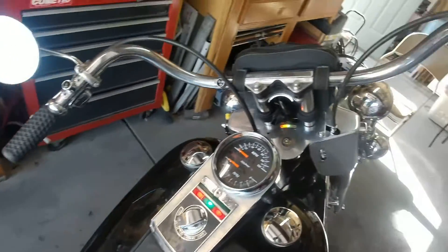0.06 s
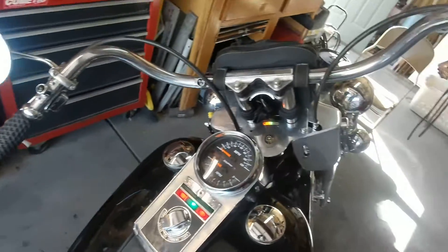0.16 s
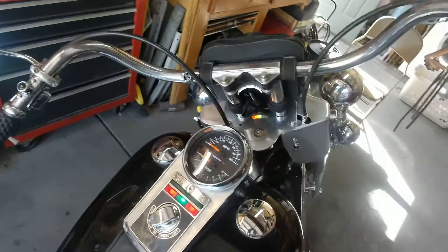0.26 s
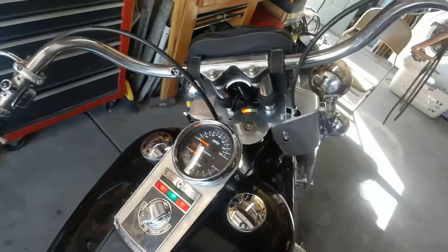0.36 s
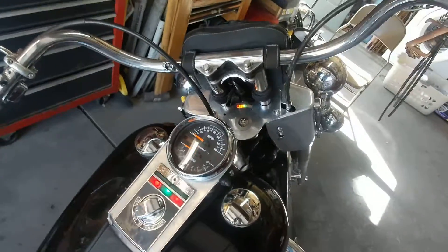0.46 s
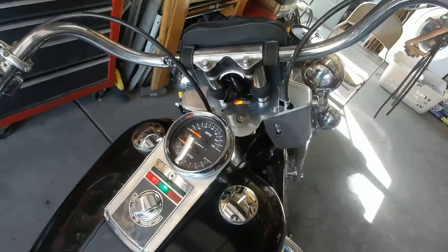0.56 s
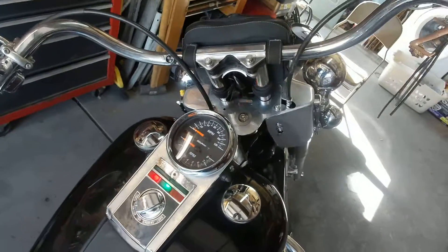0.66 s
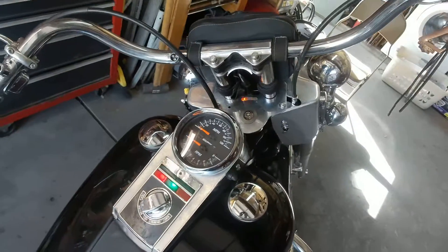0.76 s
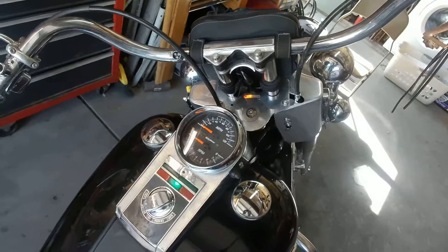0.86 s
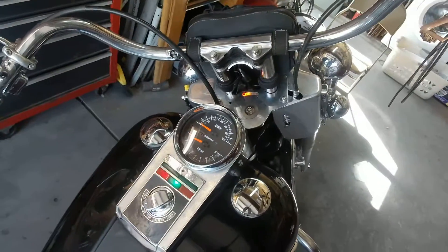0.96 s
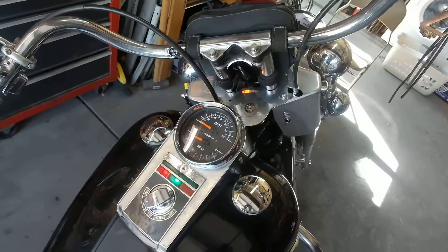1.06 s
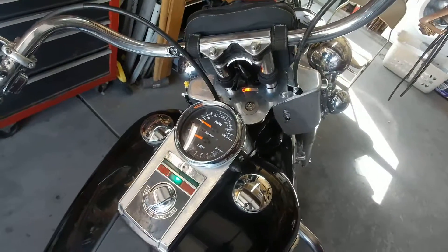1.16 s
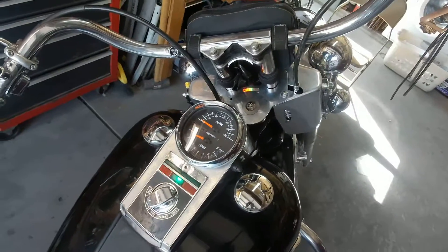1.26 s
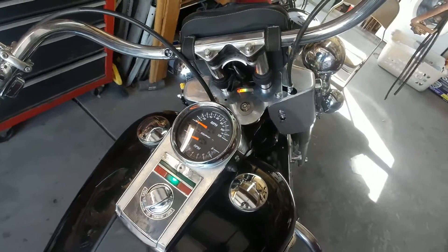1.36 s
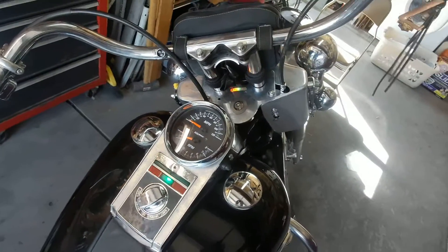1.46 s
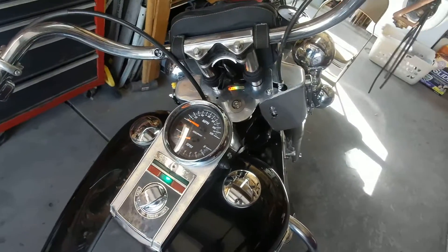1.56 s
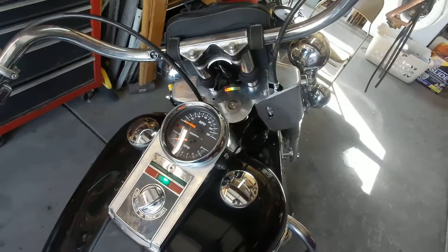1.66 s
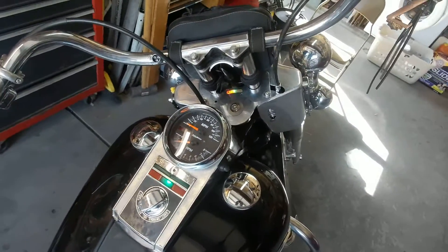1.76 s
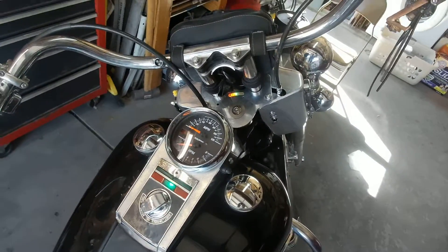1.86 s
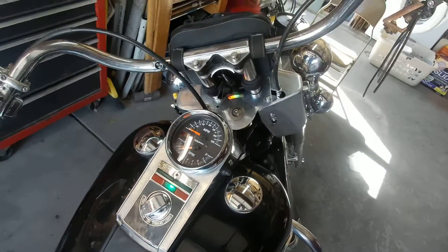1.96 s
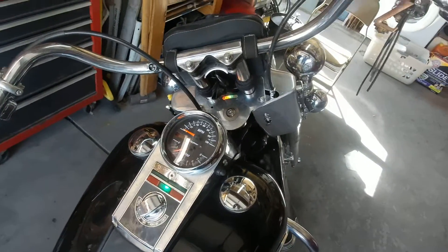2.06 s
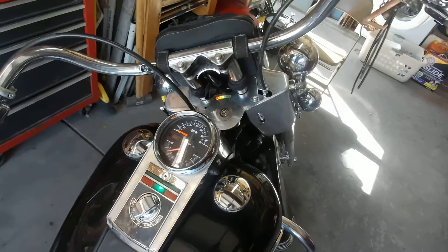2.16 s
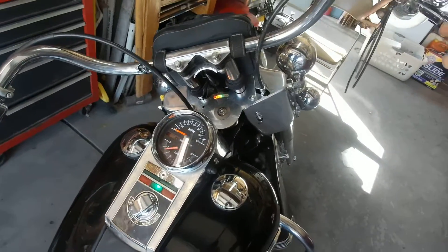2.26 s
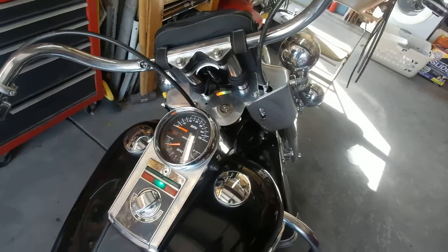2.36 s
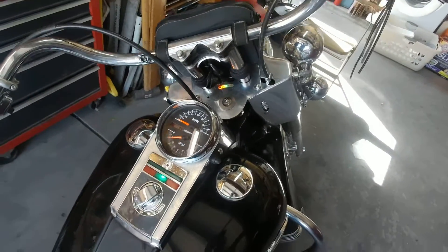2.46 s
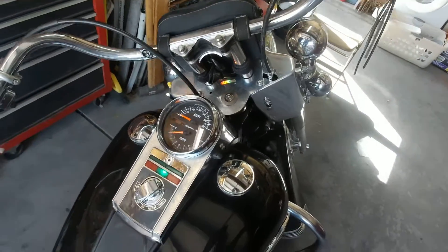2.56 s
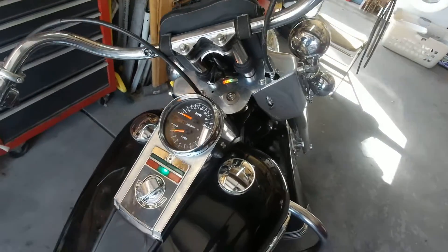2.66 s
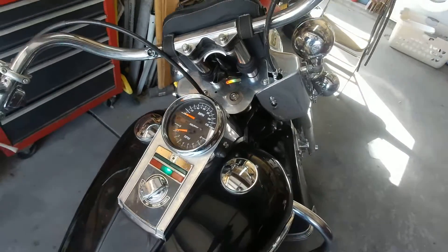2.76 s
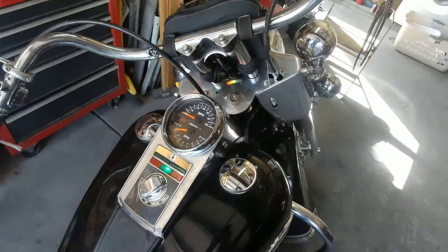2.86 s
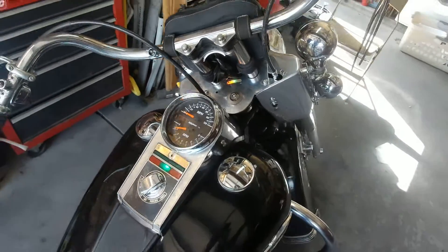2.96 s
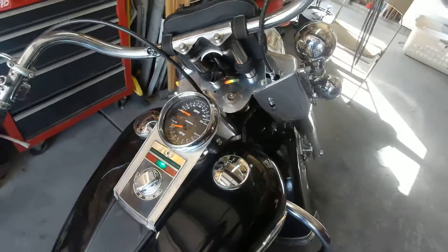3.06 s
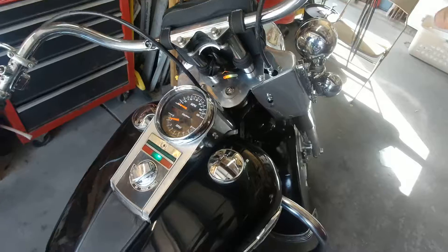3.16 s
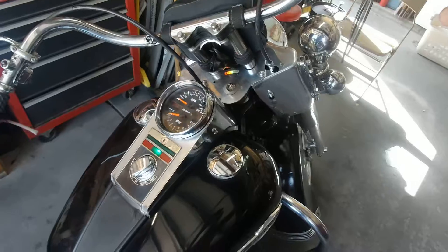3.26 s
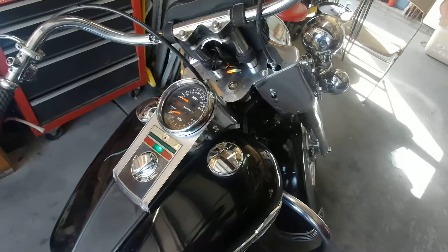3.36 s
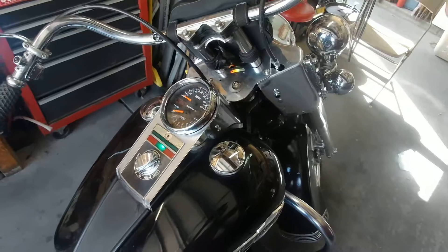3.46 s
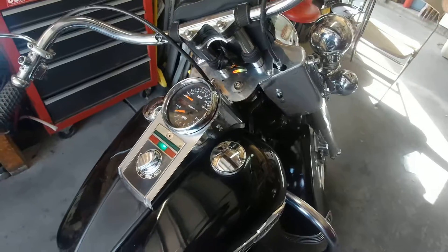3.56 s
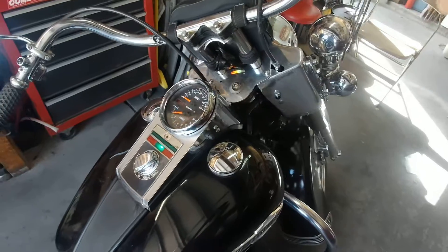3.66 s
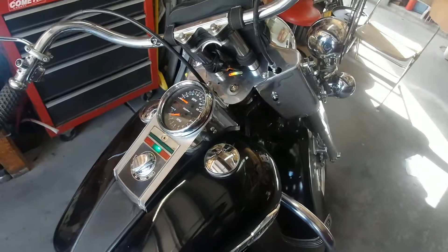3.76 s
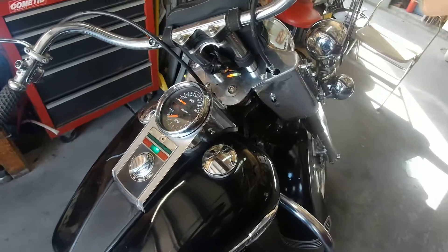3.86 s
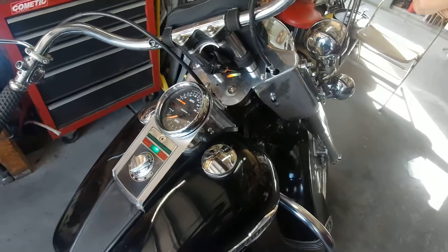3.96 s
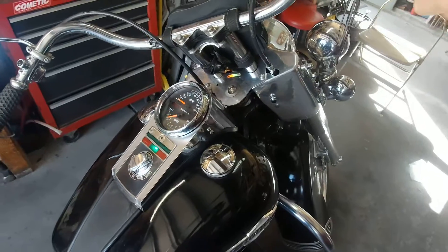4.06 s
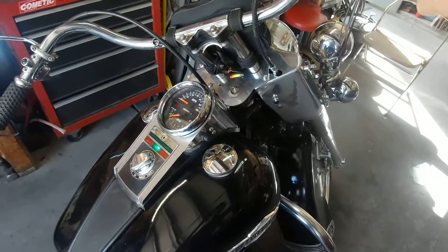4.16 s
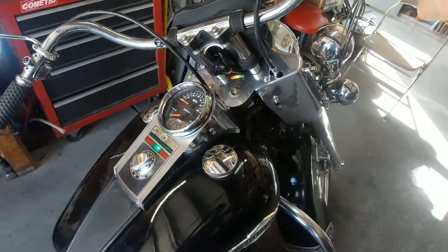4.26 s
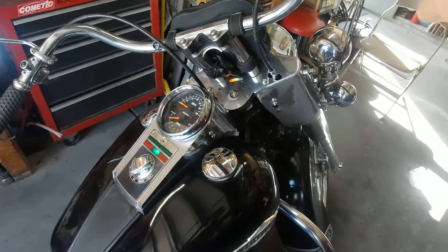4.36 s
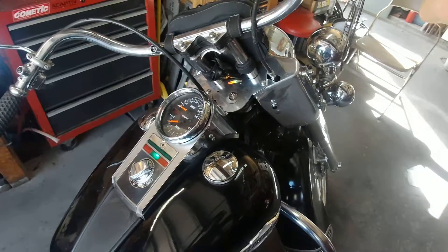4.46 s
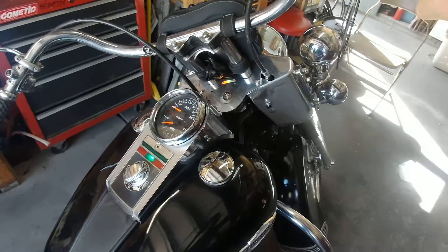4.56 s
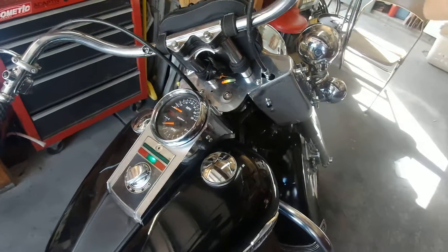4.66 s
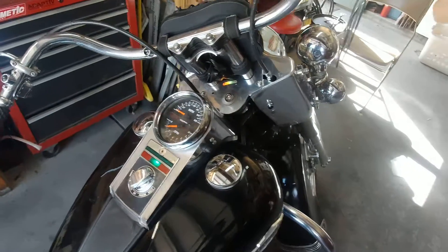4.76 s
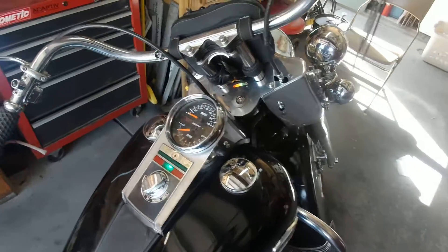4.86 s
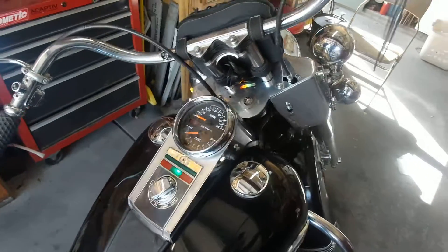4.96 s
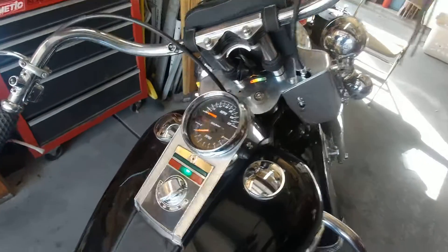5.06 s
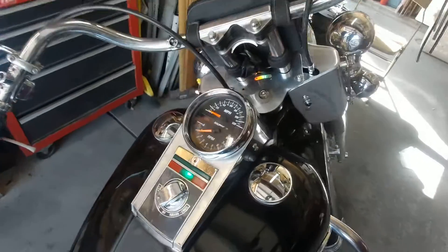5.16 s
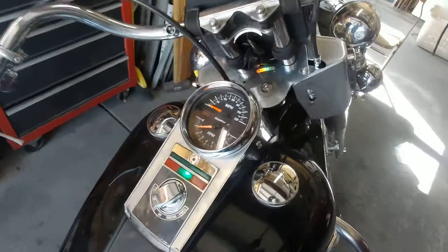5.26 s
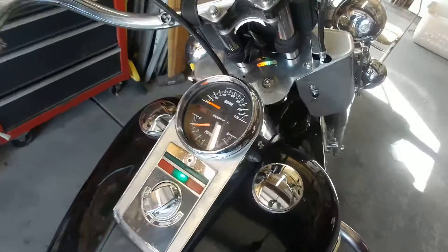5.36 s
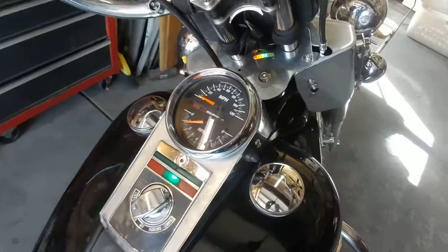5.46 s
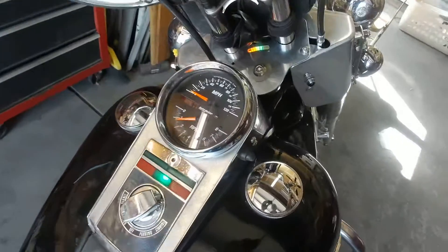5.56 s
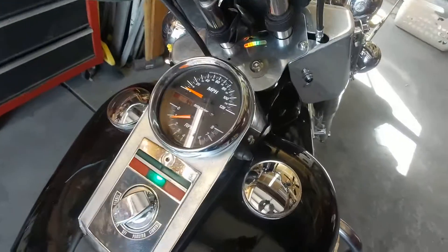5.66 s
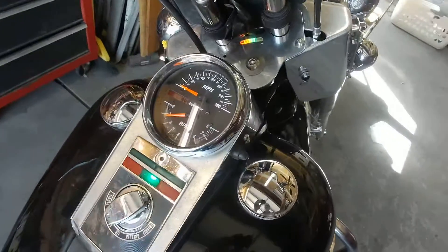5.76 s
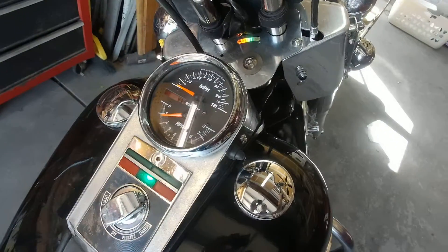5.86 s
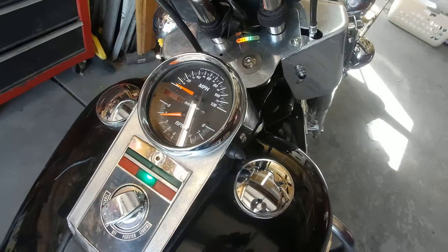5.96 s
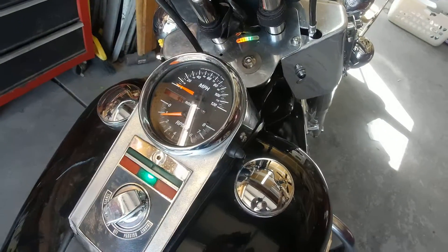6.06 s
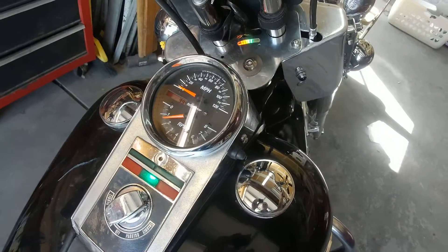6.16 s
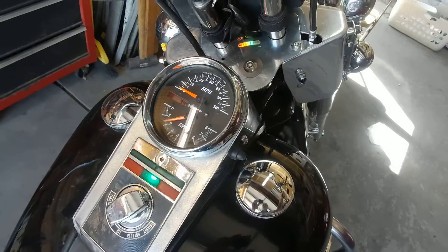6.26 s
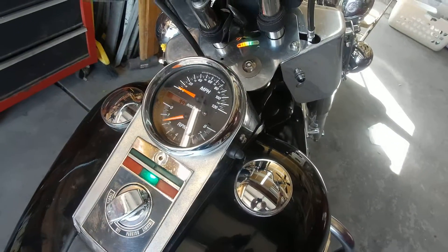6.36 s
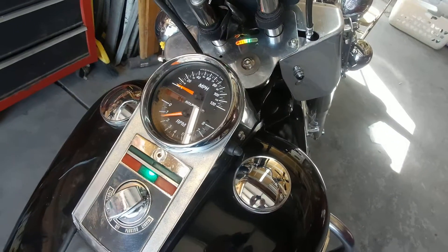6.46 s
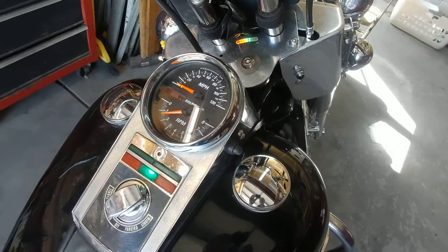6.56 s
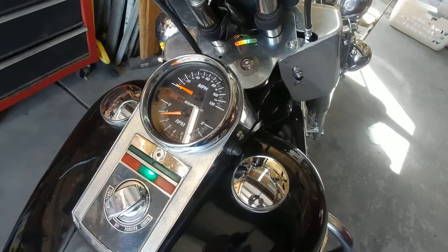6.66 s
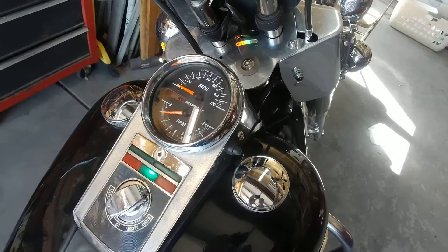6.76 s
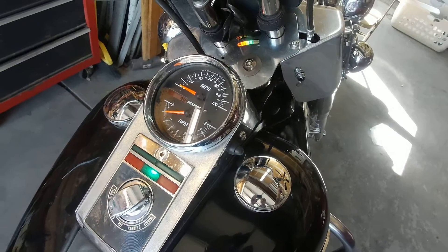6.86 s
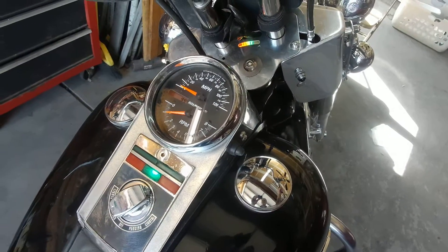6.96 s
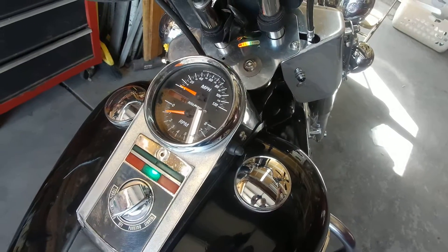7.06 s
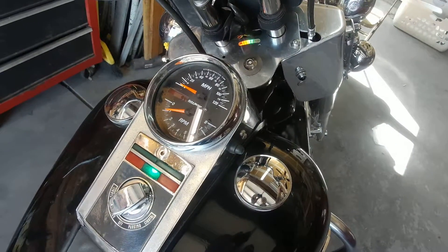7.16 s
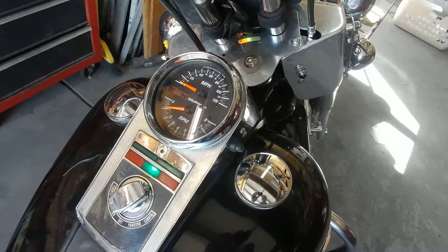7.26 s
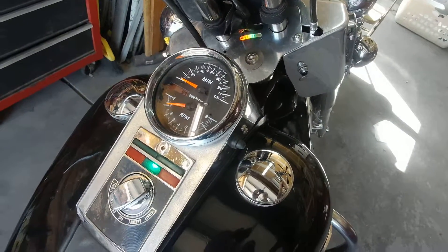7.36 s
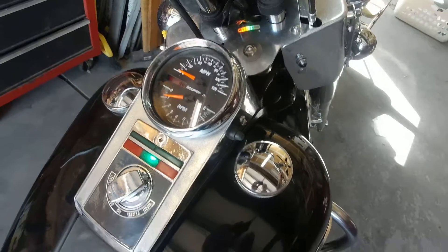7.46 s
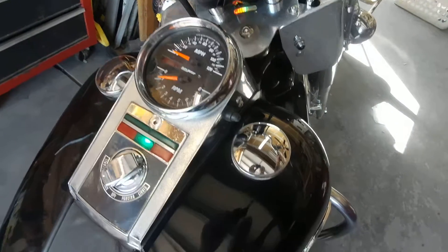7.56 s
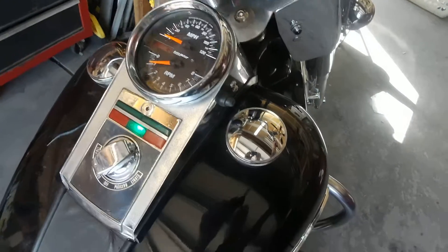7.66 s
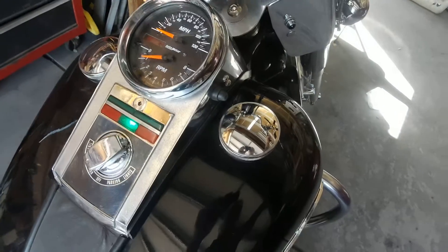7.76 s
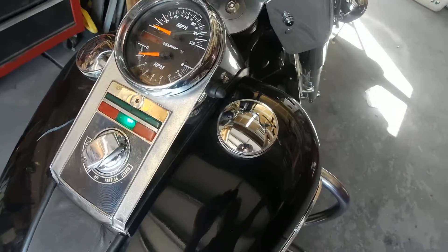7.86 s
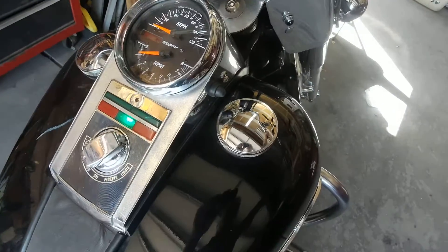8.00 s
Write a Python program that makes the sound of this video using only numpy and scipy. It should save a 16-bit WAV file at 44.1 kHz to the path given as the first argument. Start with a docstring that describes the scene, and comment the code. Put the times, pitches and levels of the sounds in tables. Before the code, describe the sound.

Heard from the saddle indoors, a large motorcycle cranks, fires up with booming cracks, revs in three short bursts and lopes unevenly.

```python
"""A big V-twin motorcycle in a garage, heard from the saddle: first the starter's pinion clacks in over faint room
tone, whines and grinds, its pitch sagging at each compression. The engine catches: gas slugs ring damped low
resonances under noise bursts of crack and blat, while meshing teeth whine, valve gear clatters and the intake barks.
Three blips of the throttle follow, with coasting between; the loping idle leaves about one stroke in four weak.
The walls answer with a diffuse tail throughout; the microphone rounds off tall peaks and adds bright overload ticks."""
import sys
import numpy as np
from scipy import signal
from scipy.fft import rfft, irfft, next_fast_len
from scipy.io import wavfile
from scipy.ndimage import uniform_filter1d, map_coordinates

SR = 44100
rng = np.random.default_rng(int(sys.argv[2]) if len(sys.argv) > 2 else 0)


def output_pcm(signal):
    """Save a mono or channel-first signal as 16-bit PCM at the path in sys.argv[1].

    Samples are clipped to [-1, 1] before scaling.
    """
    pcm = np.clip(np.atleast_2d(signal).T, -1, 1) * 32767
    wavfile.write(sys.argv[1], SR, np.round(pcm).astype(np.int16))


N = 354123

# All table levels are relative: they are set before the mix.
# faint low room tone: (frequency [Hz], level per Hz [dB])
ROOM_TONE = [(20, 2.5), (60, -9), (150, -11.5), (220, -23.5), (400, -26), (1000, -29), (3000, -43.5),
             (12000, -74.5)]
# decay of the walls' diffuse answer: (frequency [Hz], t60 [s])
GARAGE_DECAY = [(150, 0.94), (1000, 0.25), (4000, 0.32), (12000, 0.29)]

# solenoid and pinion striking home: (time [s], level [dB])
PINION_CLACKS = [(0.559, -18.5), (0.587, -9), (0.725, -11.5), (0.771, -11.5), (0.88, -11)]
# noise of grinding starter teeth and of the clacks: (frequency [Hz], level per Hz [dB])
STARTER_SPECTRUM = [(80, -29), (150, 5.5), (250, -16), (400, 5), (600, -2), (950, 3.5), (1500, 0.5),
                    (2050, 0), (2220, 3.5), (2450, -9.5), (4100, -9), (5500, -24.5), (8500, -35.5),
                    (15000, -88)]
# starter whine: (multiple of the mesh, level running free [dB], level under compression [dB])
PINION_HARMONICS = [(1, 2, -4), (2, 0, 4), (3, -3, -2), (4, -4, 0), (5, -15, -7)]
# resonances of the starter's housing: (frequency [Hz], level [dB])
HOUSING_RESPONSE = [(500, -5), (760, 1), (950, -7), (1150, 0), (1300, 3), (1420, -3), (1550, 2), (1850, -5),
                    (2230, 5), (2450, -9), (3000, -2), (4000, -14)]
# compressions that drag the starter down:
# (time [s], lowest mesh [Hz], time to sag [s], grind level [dB], whine level [dB])
COMPRESSION_DRAG = [(0.752, 500, .03, -24.5, -23), (1.022, 575, 0.034, -25, -18.5),
                    (1.166, 570, 0.032, -21, -18), (1.312, 565, 0.03, -21.5, -17.5)]

# The twin has one power stroke a crank turn; its salvos of firings and misses also pin the strokes in time:
# (time [s], strokes: x fires and - misses, crack level [dB], boom level [dB], blat level [dB])
STROKE_SALVOS = [(0.917, "x", -10.5, -14, -23.5), (1.0855, "x", -7, -16, -23.5),
                 (1.2028, "x", -8.5, -11.5, -18.5), (1.3433, "xx", -6, -10.5, -14),
                 (1.4925, "xx", -8, -10, -13.5), (1.611, "x", -8.5, -5, -27.5),
                 (1.6522, "xx-", -22.5, -11.5, -21), (1.8089, "x", -20.5, -14.5, -22),
                 (1.856, "x", -13.5, -8, -19), (1.9098, "xx", -9.5, -5, -11),
                 (1.9862, "xx", -13, -10.5, -13), (2.0449, "x-----------", -22, -12, -21),
                 (2.5502, "x", -24.5, -15.5, -24.5), (2.599, "x--", -19, -14, -26),
                 (2.803, "x--", -13.5, -16.5, -22.5), (3.0084, "x", -21.5, -14, -22),
                 (3.094, "x-", -15.5, -12, -22.5), (3.234, "xxx-", -16, -13, -21),
                 (3.4694, "xxxx", -18, -12, -21.5), (3.6758, "xxxx", -19.5, -12.5, -21),
                 (3.841, "xxxx", -14, -12, -16), (3.981, "x-----------", -13, -5.5, -19),
                 (4.443, "xx--", -21, -16.5, -20), (4.643, "xxx-", -19, -15, -21.5),
                 (4.837, "xxx-", -21.5, -12.5, -23.5), (5.0231, "xxx-", -21.5, -13.5, -23),
                 (5.2066, "xxx-", -22, -13, -21), (5.3824, "xxx-", -22, -14.5, -19),
                 (5.5605, "xxx-", -21.5, -13.5, -19.5), (5.739, "xxx-", -21, -14.5, -19.5),
                 (5.915, "xxx-", -20.5, -16, -19.5), (6.087, "xxxx", -16.5, -12, -16),
                 (6.2406, "xx", -15.5, -14, -16.5), (6.3037, "x-------", -36, -15, -29.5),
                 (6.607, "x---", -21.5, -14.5, -19.5), (6.7875, "xxx---", -25, -17.5, -23),
                 (7.125, "xx--", -21, -15.5, -23), (7.382, "xxx-", -17, -14.5, -20.5),
                 (7.628, "x", -17, -14, -21.5), (7.684, "x", -14.5, -13, -21),
                 (7.752, "x-", -22, -11.5, -22.5), (7.878, "x", -19, -15, -21), (7.933, "x", -13, -14, -22),
                 (7.9988, "x", -16.5, -9, -20.5)]
# crank speed, pushed up by the throttle and coasting down after each blip: (time [s], speed [turns/s])
CRANK_SPEED = [(1, 10), (1.28, 9.6), (1.42, 15.6), (1.55, 17.2), (1.66, 20.6), (1.8, 17.8), (1.87, 21.7),
               (1.95, 28), (2.05, 32.2), (2.2, 25.1), (2.35, 21.8), (2.47, 17.4), (2.58, 15.3), (2.8, 13.5),
               (2.9, 13.4), (3.12, 12.8), (3.35, 16.1), (3.57, 19.2), (3.76, 24.7), (3.91, 26), (4, 32),
               (4.12, 28.6), (4.27, 22.5), (4.43, 19.9), (4.74, 19.8), (5.1, 21.6), (5.5, 22.1),
               (6.08, 22.7), (6.18, 29.7), (6.29, 31.6), (6.48, 25.3), (6.7, 20.6), (6.78, 19),
               (6.93, 16.5), (7.1, 16), (7.3, 15.8), (8, 15.4)]
# low resonances of pipes and garage: (frequency [Hz], width [Hz], level [dB])
BOOM_MODES = [(32.5, 9.7, -9.5), (49, 10, -10), (66, 9.1, 1), (100.2, 18.8, 7), (128.7, 9.4, -5.5),
              (144.2, 6.9, -15), (164.8, 5.73, -9), (210, 14, -27), (241.7, 6.85, -12.5), (273, 12, -28.5),
              (325.5, 21, -22), (393, 19, -33.5), (453, 21, -26.5), (524, 12, -18.5), (670, 30, -36),
              (787, 15, -29)]
# exhaust crack: (frequency [Hz], level per Hz [dB])
CRACK_SPECTRUM = [(500, -12.5), (1100, 2.5), (1700, 4.5), (2250, 4), (2480, 4), (2700, -2.5), (3300, 0.5),
                  (4000, -7), (5200, -13.5), (7000, -21), (10000, -45), (15000, -64.5)]
# exhaust blat, also the chuff of a miss: (frequency [Hz], level per Hz [dB])
BLAT_SPECTRUM = [(60, -20), (150, 17), (240, 7), (380, -1), (700, -1.5), (1000, -8.5), (1600, -6.5),
                 (4000, -74)]
# rasp of hard firings: (frequency [Hz], level per Hz [dB])
RASP_SPECTRUM = [(2500, -17), (5000, -6.5), (9000, 6), (12000, -17.5), (15000, -19.5)]

# valve clatter: (frequency [Hz], level per Hz [dB])
CLATTER_SPECTRUM = [(150, 6.5), (300, -18), (500, 4.5), (750, -11.5), (900, -4), (1150, -4), (1500, 1),
                    (2300, -2.5), (2900, -12.5), (3900, -15), (5200, -34), (8000, -40), (14000, -62.5)]
# gear whine: (multiple of the mesh, level when pulling [dB], level when slowing [dB])
GEAR_HARMONICS = [(2, -8, 2), (3, 5.5, 0.5), (4, -1.5, 0), (5, -7, -1.5), (6, -11, -4)]
# what the engine case radiates of the whine: (frequency [Hz], level [dB])
CASE_RESPONSE = [(600, -18), (1000, -5), (1150, 0), (1300, -1.5), (1470, 3.5), (1700, 1.5), (1900, -4),
                 (2400, -3), (2900, -9), (4000, -21)]
# metal pings set off by a few firings: (time [s], frequency [Hz], level [dB])
METAL_PINGS = [(1.207, 2510, -9.5), (1.344, 2920, -9), (1.348, 1642, -13), (2.05, 2880, -20.5),
               (2.864, 2240, -25.5), (3.288, 2574, -13.5), (3.518, 2496, -20.5), (3.584, 1940, -16)]
# spans with the throttle held open: (start [s], end [s], intake bark level [dB])
THROTTLE_SPANS = [(1.33, 1.56, -20), (1.9, 2.04, -24), (3.83, 3.99, -28.5), (6.08, 6.29, -24.5)]
# honk of the intake: (frequency [Hz], level per Hz [dB])
INTAKE_SPECTRUM = [(300, -31), (480, -10.5), (640, -1.5), (790, 4), (950, -5), (1500, -39.5)]
# very short, bright overload ticks around the loud moments:
# (time [s], level before the high-pass [dB], lower edge [Hz])
OVERLOAD_TICKS = [(1.6102, -13, 4000), (1.9121, -16, 5000), (1.9444, -21, 6000), (2.0104, -14, 6000),
                  (2.0203, -7, 6000), (2.0314, -15, 8000), (3.9464, -5, 4500), (6.1729, -8, 9000)]
# fizz at each tick: (frequency [Hz], level per Hz [dB])
TICK_SPECTRUM = [(3000, -48), (6000, 18.5), (9000, 10.5), (14000, 5.5), (15000, -0.5)]

STARTER_ON_S, STARTER_OFF_S, SPIN_UP_S = 0.56, 1.4, 0.021
CRANKING_MESH_HZ = 741.4  # the starter's gear pitch between compressions
RECOVER_S, GRIND_S = 0.014, 0.024  # its pitch recovers; the grind swells and fades
INRUSH_DB, INRUSH_FALL_DB_PER_S, DRAG_DB = -23, 55, -42  # a burst of grinding as it sets off, soon fading
FREE_WHINE_DB = -25
WHINE_LEAD_S, WHINE_SWELL_S = 0.0035, 0.024  # under compression the whine swells just ahead of the grind

VEE_TURNS = 1 / 8  # how early the rear cylinder fires
IDLE_TURNS_PER_S = 22  # reference speed for levels that follow the engine
REAR_CRACK_DB, REAR_BOOM_DB = 2, 1  # the rear cylinder fires harder
# the third firing of a salvo that ends in a miss cracks less and booms slightly more
THIRD_CRACK_DB, THIRD_BOOM_DB = -2, 1
KICK_TURNS_PER_S, KICK_FADE_S = 1.45, 0.098  # each firing's push on the flywheel, before smoothing
NEAR_WALL_S, NEAR_WALL_GAIN = 0.00998, 0.41  # the first, inverted return of each boom
BRIGHT_DB_PER_OCTAVE = 3.5  # a faster engine tilts the boom toward its upper resonances
RASP_DB, RASP_GROWS = -4, 3.28  # the rasp gains 3.28 dB per dB of strength, so hard firings rasp most
MISS_BOOM_DB, MISS_CHUFF_DB = -21.5, -30.5
MISS_DB_PER_OCTAVE = -1.5  # misses weaken as engine speed rises
MISS_DULL_DB_PER_OCTAVE = -2.5  # misses are duller than firings

CLATTER_DB, CLATTER_DB_PER_OCTAVE = -35, 5  # at the reference speed, and growth with speed
GEAR_TEETH = 22
WHINE_DB, WHINE_SLOWING_DB = -39.7, 1.2
PING_T60_S = 0.05
TAP_LOW_HZ, TAP_HIGH_HZ, TAP_T60_S = 1881, 5994, 0.022  # span and life of the small steel parts' modes
VALVE_DB, VALVE_SCATTER_DB = -40.5, 4.5  # a valve seating, at the reference speed
KNOCK_DB, KNOCK_SPREAD_S = -9.5, 0.011  # taps jarred loose by a firing, relative to its crack
TOP_HZ = 15000  # the microphone's band limit


def amp(db):
    """Logarithmic level: decibels to amplitude gain."""
    return 10 ** (np.asarray(db) / 20)


def unit(x):
    """Normalization of x to an rms of 1."""
    return x / np.sqrt(np.mean(x ** 2) + 1e-20)


def along(points, hz):
    """Logarithmic interpolation: (frequency [Hz], value) points read on a log axis."""
    f, v = np.transpose(points)
    return np.interp(np.log(hz + 1), np.log(f + 1), v)


def curves(rows):
    """Linear interpolation: one value per sample for each column after the time."""
    s, *cols = np.transpose(rows)
    return [np.interp(np.arange(N) / SR, s, c) for c in cols]


def wobble(rate):
    """Band-limited random modulation: a smooth curve through random knots, rate of them a second."""
    knots = rng.standard_normal(int(N * rate / SR) + 4)
    return map_coordinates(knots, [np.arange(N) * rate / SR])


def filtered(x, response):
    """Linear filtering: the spectrum of x times a response of frequency."""
    size = next_fast_len(N + 8192)
    return irfft(rfft(x, size) * response(np.fft.rfftfreq(size, 1 / SR)), size)[:N]


def noise(spectrum):
    """Spectral shaping: white noise coloured by the spectrum, at rms 1."""
    white = rng.standard_normal(N)
    return unit(filtered(white, lambda hz: amp(along(spectrum, hz))))


def add(track, s, sound):
    """Superposition: mix a sound into the track at time s."""
    start = max(0, round(s * SR))
    part = track[start:start + len(sound)]
    part += sound[:len(part)]


def bursts(times, levels, spectrum, attack, t60):
    """Incoherent addition: puffs of coloured noise rise quickly and decay, and their powers sum."""
    t = np.arange(SR // 3) / SR
    shape = (1 - np.exp(-t / attack)) * amp(-60 * t / t60)
    power = np.zeros(N)
    for s, db in zip(times, levels):
        add(power, s, (amp(db) * shape / shape.max()) ** 2)
    return np.sqrt(power) * noise(spectrum)


def patchy(x, depth_db):
    """Time-varying filtering: the colour of x changes at random from one moment to the next."""
    z = signal.stft(x, nperseg=512)[2]
    field = uniform_filter1d(rng.standard_normal(z.shape), size=4, axis=0)  # smooth over frequency
    field = uniform_filter1d(field, size=7, axis=1)  # smooth over time
    return signal.istft(z * amp(depth_db * unit(field)), nperseg=512)[1][:N]


def room_tone():
    """Stationary noise: a faint, low background."""
    return amp(-54.0) * noise(ROOM_TONE)


def starter_effort():
    """Torque balance: the gear pitch [Hz] and grinding gain as the starter spins up and meets each compression."""
    t = np.arange(N) / SR
    on = np.maximum(t - STARTER_ON_S, 0)
    hz = CRANKING_MESH_HZ * (1 - np.exp(-on / SPIN_UP_S) / 2)
    gain = amp(INRUSH_DB - INRUSH_FALL_DB_PER_S * on) + amp(DRAG_DB)
    for s, low_hz, sag_s, db, _ in COMPRESSION_DRAG:
        dip = np.exp(-((t - s) / np.where(t < s, sag_s, RECOVER_S)) ** 2)
        hz = hz + (low_hz - CRANKING_MESH_HZ) * dip
        gain = gain + amp(db) * np.exp(-((t - s) / GRIND_S) ** 2)
    return hz * (1 + 0.0116 * wobble(24.93)), gain


def starter():
    """Gear-mesh excitation: among the clacks, harmonics of the tooth rate whine and noise pulses at that rate."""
    mesh_hz, grind = starter_effort()
    t = np.arange(N) / SR
    engaged = np.clip(np.minimum(t - STARTER_ON_S, STARTER_OFF_S - t) / 0.021, 0, 1)
    mesh = 2 * np.pi * np.cumsum(mesh_hz) / SR
    first_load = COMPRESSION_DRAG[0][0]
    free = np.clip(np.minimum((t - STARTER_ON_S) / 0.075, (first_load - t) / 0.025), 0, 1)
    loaded = np.zeros(N)
    for s, *_, db in COMPRESSION_DRAG:
        loaded += amp(db) * np.exp(-((t - s + WHINE_LEAD_S) / WHINE_SWELL_S) ** 2)
    whine = np.zeros(N)
    for k, free_db, loaded_db in PINION_HARMONICS:
        tone = np.sin(k * mesh + 0.35 * wobble(170)) * amp(2 * wobble(60))
        whine += tone * (free * amp(FREE_WHINE_DB + free_db) + loaded * amp(loaded_db)) / 2
    # the gliding tones flare in the housing's resonances
    whine = filtered(whine, lambda hz: amp(along(HOUSING_RESPONSE, hz)))
    teeth = patchy(noise(STARTER_SPECTRUM), depth_db=3.0)
    teeth = unit(teeth * (1 + 0.8 * np.cos(mesh)) * amp(2.5 * wobble(300)))
    s, db = np.transpose(PINION_CLACKS)
    clacks = bursts(s, db - 9.0, STARTER_SPECTRUM, attack=0.0013, t60=0.17)
    return engaged * (grind * teeth + whine) + clacks


def garage(x):
    """Diffuse reverberation: convolution with decaying noise, whose decay time depends on frequency."""
    hz, t, z = signal.stft(rng.standard_normal(SR // 2), SR, nperseg=256)
    decay = amp(-60 * t / along(GARAGE_DECAY, hz)[:, None])
    tail = signal.istft(z * decay, SR, nperseg=256)[1]
    tail = tail * np.minimum(np.arange(len(tail)) / SR / 0.006, 1)  # the answer builds up over 6 ms
    return signal.fftconvolve(x, tail / np.linalg.norm(tail))[:N]


def crank():
    """Crank kinematics: speed [turns/s] per sample and every stroke's time, the vee making the rear one early."""
    t = np.arange(N) / SR
    starts = np.array([row[0] for row in STROKE_SALVOS])
    counts = [len(row[1]) for row in STROKE_SALVOS]
    stroke = np.arange(1, sum(counts) + 1)
    angle = stroke - stroke % 2 * VEE_TURNS
    first = angle[np.cumsum(counts) - counts]  # angle of each salvo's first stroke
    speed, = curves(CRANK_SPEED)
    turns = np.cumsum(speed) / SR
    stroke_turns = np.interp(angle, first, np.interp(starts, t, turns))
    return speed, np.interp(stroke_turns, turns, t)


def ignite(strokes):
    """Intermittent combustion: strokes sorted into firings (s, crack, boom, blat dB) and the times of misses."""
    firings, misses, k = [], [], 0
    for _, pattern, crack_db, boom_db, blat_db in STROKE_SALVOS:
        for place, mark in enumerate(pattern):
            rear = k % 2 == 0
            third = place == 2 and pattern.endswith("-")
            if mark == "x":
                crack = crack_db + rear * REAR_CRACK_DB + third * THIRD_CRACK_DB
                boom = boom_db + rear * REAR_BOOM_DB + third * THIRD_BOOM_DB
                firings.append((strokes[k], crack, boom, blat_db))
            else:
                misses.append(strokes[k])
            k += 1
    return np.array(firings), np.array(misses)


def booms(times, levels, paces, dull_db, walls, rise=0.016, lag=0.00417, scatter_db=2.5, skew=0.92,
          stray=0.77, build=0.016):
    """Modal excitation: each gas slug swells and rings damped low modes; the walls return them out of step."""
    hz, width, db = np.transpose(BOOM_MODES)[:, :, None]
    lead = 1 / 32  # room for the swell before each slug [s]
    t = np.arange(SR // 4) / SR - lead
    after = np.maximum(t, 0)
    swell = (np.minimum(t, 0) / rise) ** 2
    rings = np.exp(2j * np.pi * hz * t - np.pi * width * after - swell)
    answer = (1 - np.exp(-after / build)) * rings
    out_of_step = skew * (-1) ** np.arange(len(BOOM_MODES))
    draws = rng.standard_normal((len(times), 2, len(BOOM_MODES)))
    track = np.zeros(N)
    for s, level, pace, (size, drift) in zip(times, levels, paces, draws):
        # harder and faster slugs are brighter
        tilt = dull_db + 0.11 * (level + 8.5) + BRIGHT_DB_PER_OCTAVE * pace
        gain = amp(level + db[:, 0] + tilt * np.log2(hz[:, 0] / 100) + scatter_db * size)
        returned = (gain * np.exp(1j * (out_of_step + stray * drift))) @ answer
        thump = (gain @ rings + walls * returned).real
        add(track, s + lag - lead, thump)
        add(track, s + lag - lead + NEAR_WALL_S, -NEAR_WALL_GAIN * thump)
    return filtered(track, lambda f: f ** 2 / (f ** 2 + 18 ** 2) / (1 + (f / 1500) ** 4))


def exhaust(speed, firings, misses):
    """Pulsed gas flow: firings boom, blat, crack and rasp; misses boom weakly and chuff. Returns (boom, gas)."""
    s, crack_db, boom_db, blat_db = firings.T
    octaves = np.log2(speed / IDLE_TURNS_PER_S)
    firing_pace, miss_pace = [np.interp(times * SR, np.arange(N), octaves) for times in (s, misses)]
    weak_db = MISS_DB_PER_OCTAVE * miss_pace + 2.2 * rng.standard_normal(len(misses))
    boom = amp(-8.0) * booms(s, boom_db, firing_pace, dull_db=-0.5, walls=2.9)
    weak_boom = booms(misses, MISS_BOOM_DB + weak_db, miss_pace, dull_db=MISS_DULL_DB_PER_OCTAVE, walls=3.7)
    boom = boom + amp(-7.5) * weak_boom
    crack = bursts(s - 0.003, crack_db - 10, CRACK_SPECTRUM, attack=0.004, t60=0.066)
    crack = patchy(crack, depth_db=3.5) * amp(2.5 * wobble(500) - 0.7)
    blat = bursts(s - 0.002, blat_db + 3.8, BLAT_SPECTRUM, attack=0.0023, t60=0.15)
    rasp_db = RASP_DB + RASP_GROWS * (crack_db + boom_db + blat_db) / 3
    rasp = bursts(s, rasp_db, RASP_SPECTRUM, attack=0.003, t60=0.085) * amp(3 * wobble(400))
    chuff = bursts(misses, MISS_CHUFF_DB + weak_db, BLAT_SPECTRUM, attack=0.004, t60=0.2)
    return boom, crack + blat + rasp + chuff


def flywheel(speed, firings):
    """Rotational inertia: crank turns so far, each firing adding a kick of speed that dies away."""
    kicks = np.bincount(np.round(firings[:, 0] * SR).astype(int), minlength=N)[:N]
    surge = signal.lfilter([KICK_TURNS_PER_S], [1, -np.exp(-1 / (KICK_FADE_S * SR))], kicks)
    surge = uniform_filter1d(surge, SR // 50) - uniform_filter1d(surge, SR // 3)  # keep only the fast part
    return np.cumsum(speed + surge) / SR


def valve_clatter(speed, turns):
    """Periodic modulation: clatter noise swells twice a crank turn and grows with speed."""
    level = amp(CLATTER_DB + CLATTER_DB_PER_OCTAVE * np.log2(speed / IDLE_TURNS_PER_S))
    beat = np.exp(-(2 * turns % 1) / 2.2) * amp(2.1 * wobble(40))
    return level * unit(patchy(noise(CLATTER_SPECTRUM), depth_db=3.3) * (1 + 0.39 * beat))


def gear_whine(speed, turns):
    """Tooth-mesh harmonics: tones locked to the crank, whose balance shifts as the engine slows."""
    slowing = np.clip(uniform_filter1d(-np.gradient(speed) * SR, SR // 8) / 14, 0, 1)
    whine = np.zeros(N)
    for order, pull_db, slow_db in GEAR_HARMONICS:
        flutter = (0.75 - 0.2 * slowing) * wobble(80)
        tone = np.sin(2 * np.pi * order * GEAR_TEETH * turns + flutter) * amp(3.2 * wobble(30))
        whine += amp(pull_db + slowing * (slow_db - pull_db)) * tone
    whine = unit(filtered(whine, lambda hz: amp(along(CASE_RESPONSE, hz))))
    whine = whine * (1 + 0.41 * (1 - slowing) * np.cos(2 * np.pi * turns))  # under load it throbs once a turn
    return amp(WHINE_DB + WHINE_SLOWING_DB * slowing) * whine


def machinery(speed, turns):
    """Mechanical radiation: valve clatter and gear whine, fading in as the engine catches."""
    running = np.clip((np.arange(N) / SR - 1.1) / 0.22, 0, 1)
    return running * (valve_clatter(speed, turns) + gear_whine(speed, turns))


def taps(times, levels):
    """Modal impact: each tiny steel blow rings its own handful of short modes, the higher ones weaker."""
    t = np.arange(SR // 25) / SR
    track = np.zeros(N)
    for s, db, draw in zip(times, levels, rng.random(size=(len(times), 14))):
        hz = TAP_LOW_HZ * (TAP_HIGH_HZ / TAP_LOW_HZ) ** draw
        gain = (TAP_LOW_HZ / hz) ** 1.88 * (-1) ** np.arange(len(hz))
        ring = gain @ np.sin(2 * np.pi * hz[:, None] * t) / np.linalg.norm(gain)
        add(track, s, amp(db - 60 * t / TAP_T60_S) * ring)
    return track


def valve_train(speed, turns, firings):
    """Repeated impact: valves seat twice a crank turn, and each firing jars taps out of loose parts."""
    seat_turns = np.arange(2 * turns[0], 2 * turns[-1]) / 2 + 0.01
    seats = np.interp(seat_turns, turns, np.arange(N))
    seats = seats[seats > STARTER_OFF_S * SR].astype(int)
    seat_db = VALVE_DB + CLATTER_DB_PER_OCTAVE * np.log2(speed[seats] / IDLE_TURNS_PER_S)
    track = taps(seats / SR, seat_db + VALVE_SCATTER_DB * rng.standard_normal(len(seats)))
    delays = rng.random(size=(3, len(firings)))  # three taps a firing
    sizes = rng.standard_normal(size=(3, len(firings)))
    for delay, size in zip(delays, sizes):
        track += taps(firings[:, 0] + KNOCK_SPREAD_S * delay, firings[:, 1] + KNOCK_DB + 2 * size)
    return track


def pings():
    """Damped free vibration: short, slightly rough metallic rings."""
    t = np.arange(SR // 5) / SR
    track = np.zeros(N)
    for s, hz, db in METAL_PINGS:
        ring = np.sin(2 * np.pi * hz * t + 0.6 * wobble(300)[:len(t)])
        add(track, s, amp(db - 60 * t / PING_T60_S) * (1 - np.exp(-t / 0.0028)) * ring)
    return track


def intake(strokes):
    """Pulsed suction: with the throttle open, every stroke gulps air and the intake barks."""
    barks = [(s, db) for start, end, db in THROTTLE_SPANS for s in strokes if start < s < end]
    s, db = np.transpose(barks)
    return bursts(s, db, INTAKE_SPECTRUM, attack=0.003, t60=0.1)


def ticks():
    """Impulsive distortion: very short, bright overload ticks at set times, each with a faint fizz around it."""
    s, db, _ = np.transpose(OVERLOAD_TICKS)
    t = np.arange(SR // 50) / SR
    track = bursts(s - 0.003, db - 27, TICK_SPECTRUM, attack=0.006, t60=0.04)
    for s, db, edge_hz in OVERLOAD_TICKS:
        spit = amp(db - 60 * t / 0.005) * rng.standard_normal(len(t))
        high_pass = signal.butter(6, edge_hz, "high", fs=SR, output="sos")
        add(track, s, signal.sosfilt(high_pass, spit))
    return track


def scene():
    """Superposition of direct sound and reverberation: engine and starter in the garage, over room tone."""
    speed, strokes = crank()
    firings, misses = ignite(strokes)
    boom, gas = exhaust(speed, firings, misses)
    gas = gas + intake(strokes)
    turns = flywheel(speed, firings)
    metal = machinery(speed, turns) + valve_train(speed, turns, firings) + starter() + pings()
    walls = garage(amp(-5.5) * gas + amp(-6) * metal)
    return (boom + amp(-3.5) * gas + amp(-0.5) * metal + walls + room_tone())[None]


def record(dry):
    """Saturation and band limiting: the microphone rounds off tall peaks, ticks are added, the top is cut."""
    clipped = dry[0] / (1 + np.abs(dry[0] / 0.95) ** 6) ** (1 / 6)
    steep = signal.ellip(10, 0.1, 90, TOP_HZ, fs=SR, output="sos")
    return signal.sosfilt(steep, clipped + ticks())[None]


dry = scene()
out = record(dry)
output_pcm(out)
```